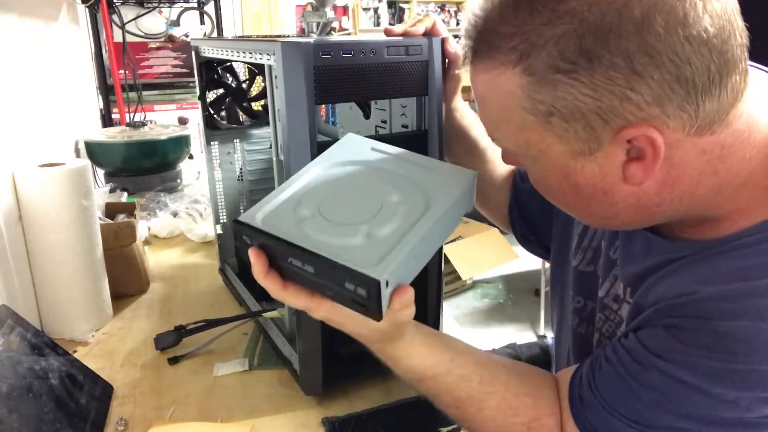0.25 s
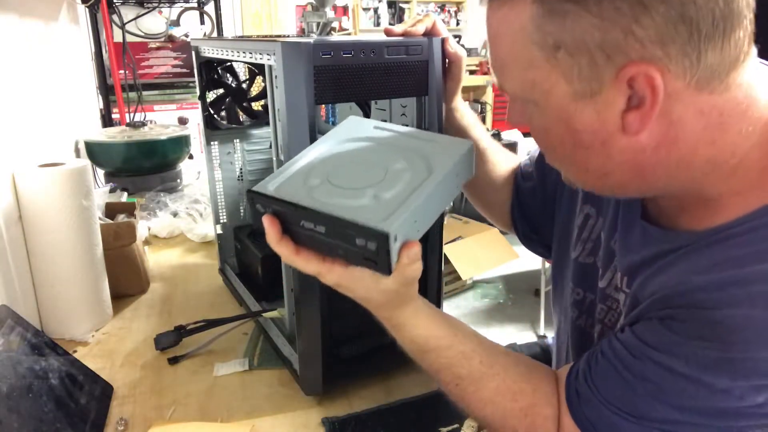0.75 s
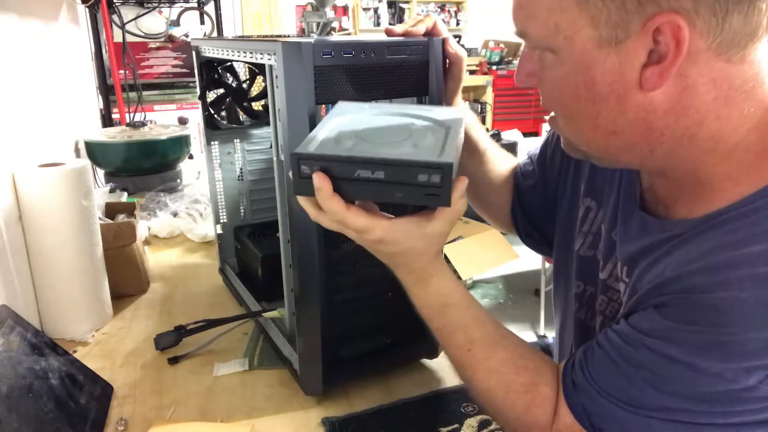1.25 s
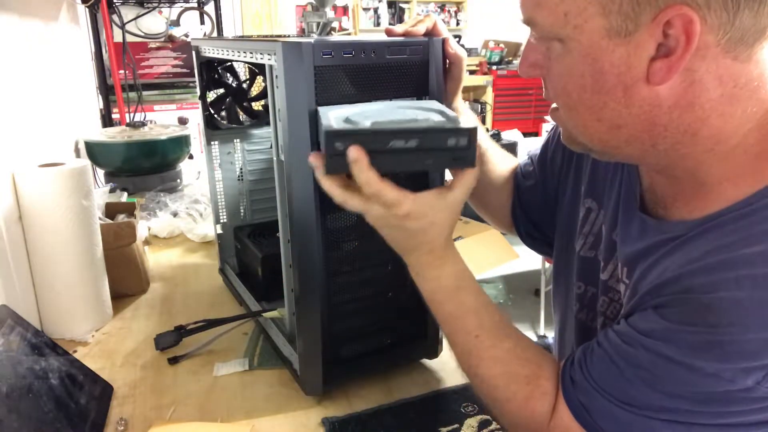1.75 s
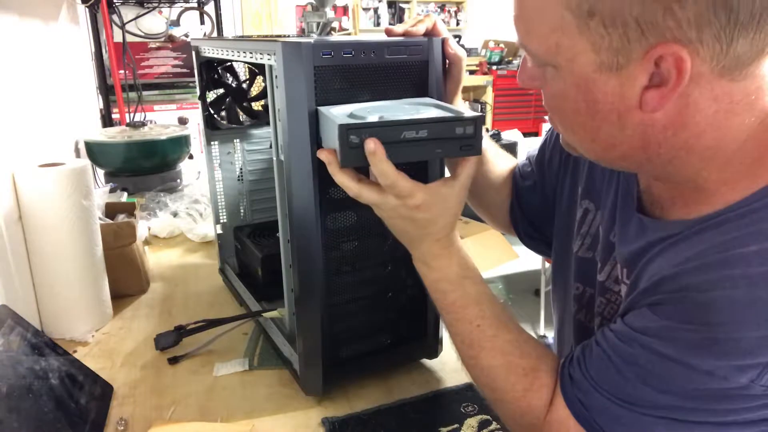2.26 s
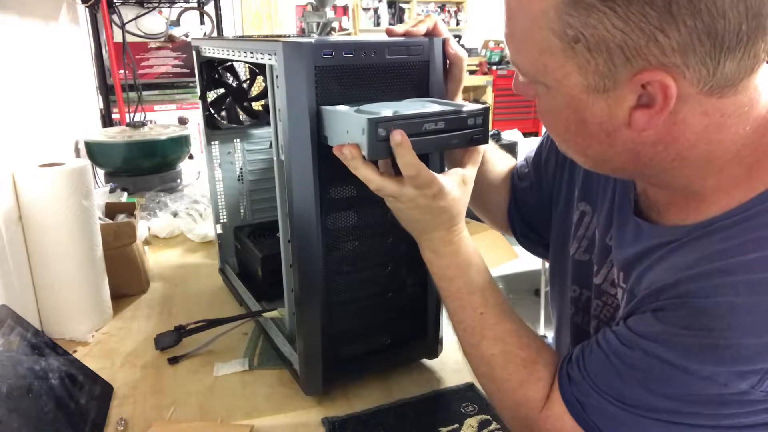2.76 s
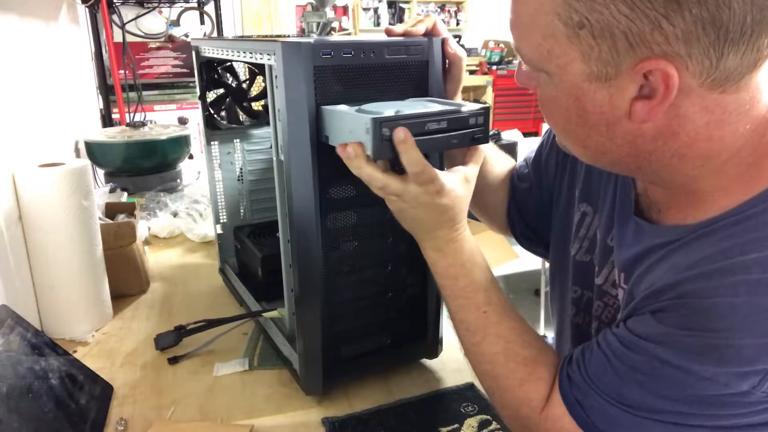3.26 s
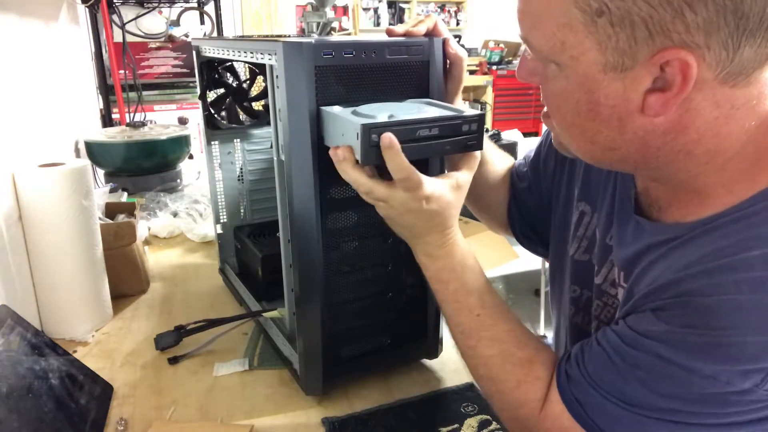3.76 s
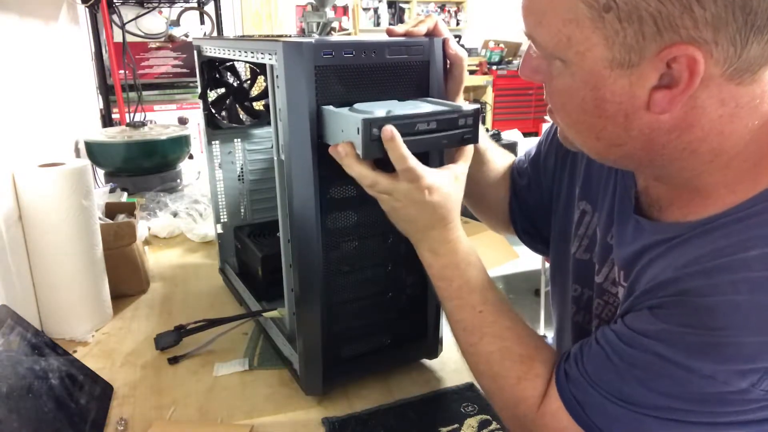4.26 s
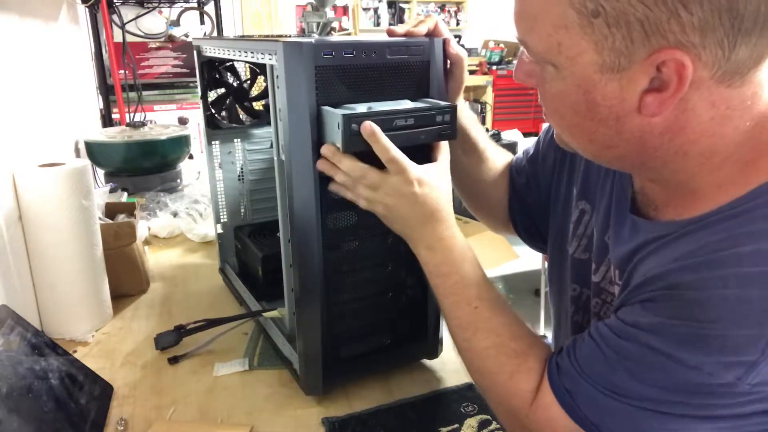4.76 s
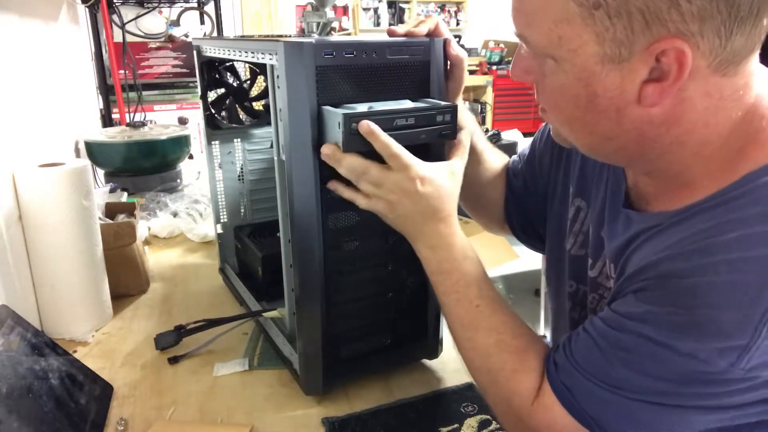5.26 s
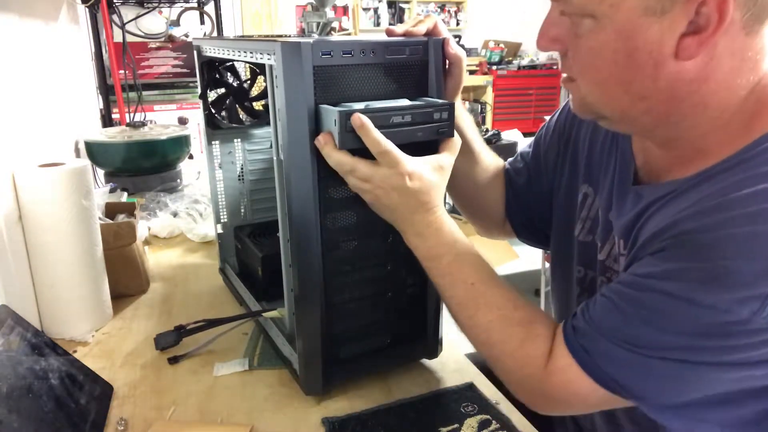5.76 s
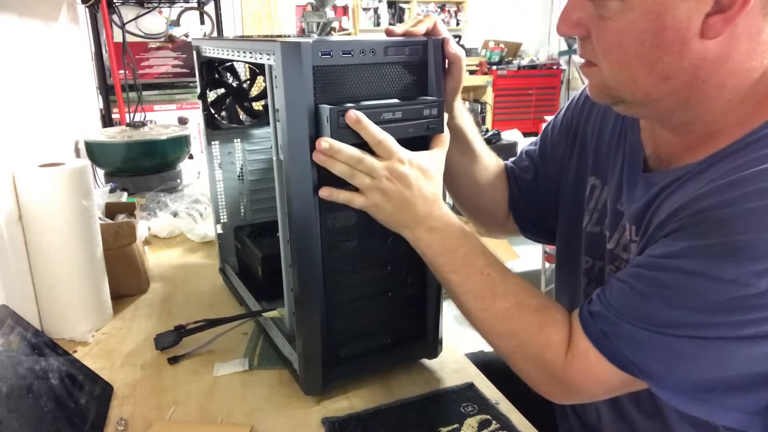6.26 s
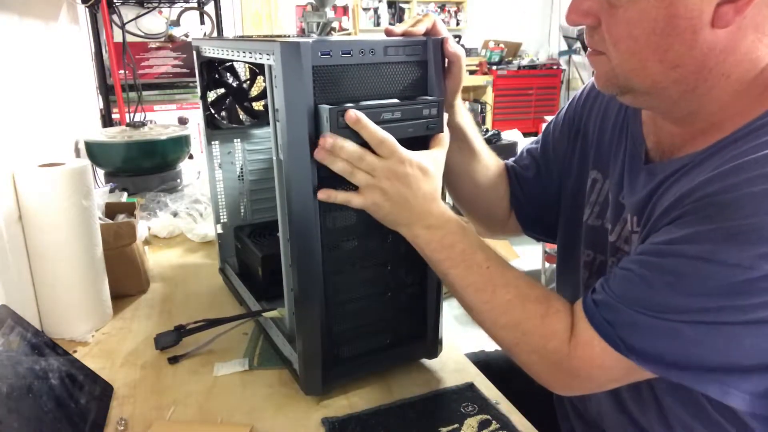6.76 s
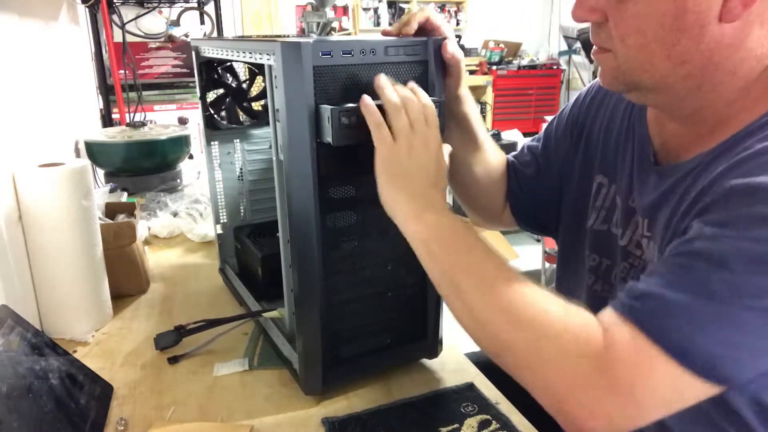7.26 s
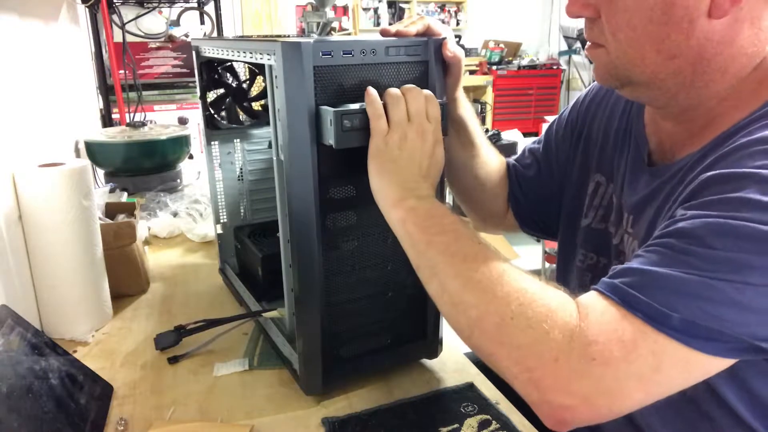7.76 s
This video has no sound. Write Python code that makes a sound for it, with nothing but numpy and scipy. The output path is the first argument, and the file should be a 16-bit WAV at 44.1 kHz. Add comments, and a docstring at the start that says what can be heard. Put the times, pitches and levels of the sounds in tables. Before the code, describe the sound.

In a small workshop, soft fan rush and low hum run throughout while a cricket chirps faintly and a dull bump hits the bench. A metal drive then slides into a steel case in short gritty scrapes with sharp ticks and brief squeals, loudest past the middle. Dull bumps gather near the end. Close microphone, slight room ring.

```python
"""A metal drive is pushed by hand into a steel computer case in a workshop, over 8 s of fan rush and hum.
First a cricket chirps outside (sine strokes in pairs) and a bump comes through the bench (low swings).
From 1.2 s the drive slips in short scrapes (grit noise through sheet-metal modes), with hard ticks (noise
cracks) and squeals and pings (single modes); a low drone swells until about 3.7 s. The scrapes are loudest
near 4.3 and 4.7 s and cluster again near 6 s; dull bumps crowd 6.9 to 7.9 s, and faint high pings end it."""
import sys
import numpy as np
from scipy import signal
from scipy.fft import rfft, irfft, next_fast_len
from scipy.io import wavfile
from scipy.ndimage import uniform_filter1d, map_coordinates

SR = 44100
rng = np.random.default_rng(int(sys.argv[2]) if len(sys.argv) > 2 else 0)


def transcribe(u):
    """Save the signal u as a 16-bit wav file named by the first command-line argument.

    u: samples, shape (n,) or (channels, n), limited to [-1, 1]; the rate is SR.
    q: integer samples, one column per channel.
    """
    v = np.clip(np.atleast_2d(u).T, -1, 1)
    q = np.round(v * 32767).astype(np.int16)
    wavfile.write(sys.argv[1], SR, q)


N = 352800

# slips of the drive on the rails: (time [s], scrape level [dB rms], rise [ms], fall before FALL_SCALES [ms],
# weight of the contact [dB], hiss against the scrape [dB])
SLIPS = [(1.169, -40.5, 11.8, 26.5, -5, -15), (1.2, -45.5, 12, 11, 0, -7.5),
         (1.314, -57.5, 13, 50, -3, -15), (1.731, -60, 59, 77, 2.5, -13), (1.798, -50.5, 30, 46, 1, -19),
         (1.845, -49.5, 5, 32, -11, -15), (2.049, -28.5, 10.3, 17.3, -6.5, -13),
         (2.082, -36, 14, 16, -13, -10), (2.174, -40.5, 2.4, 14, -4.5, -15), (2.326, -30, 11, 5.4, 1.5, -8),
         (2.359, -33.5, 28, 15, -20, -9), (2.3815, -32, 1.5, 8, -14, -15), (2.398, -37.5, 8, 12, -10, -17),
         (2.435, -48, 71, 18, 1.5, -20), (2.469, -51, 23, 21, -25, -8), (2.51, -52.5, 35, 14, 9, -4.5),
         (2.537, -39, 19, 43, -36, -11.5), (2.568, -29, 13, 12, 2, -13), (2.599, -42.5, 23, 17, 11, -6),
         (2.864, -40.5, 9.7, 19.7, 8.5, -13), (3.195, -63, 23, 20, -13, -12.5),
         (3.361, -36, 11.2, 17.7, -2, -10.5), (3.785, -41, 3.1, 16, -32, -4),
         (3.795, -42.5, 16, 4.7, -3.5, -5), (3.878, -52.5, 3, 10, -3, 3), (3.89, -46, 8, 8.4, -1, -8.5),
         (3.965, -59, 26, 42, 2, -25), (4.254, -39, 4.1, 4.9, -33, -6), (4.265, -38, 8, 10, -20, -10.5),
         (4.275, -29.5, 5, 21, -9, -10), (4.301, -19.5, 5.3, 12.2, -5.5, -13.5),
         (4.371, -39, 15, 14, -8.5, -14.5), (4.551, -40, 15.3, 20, -5.5, -9),
         (4.674, -35.5, 2.9, 95, -28.5, -10), (4.701, -26.5, 4.4, 30, 1, -9.5),
         (4.72, -24, 25, 33, -9.5, -6.5), (4.749, -15.5, 10.3, 9.4, -3.5, -12),
         (4.815, -48.5, 22, 14, 11, -12), (5.11, -72, 14.4, 29.5, 14, -1),
         (5.805, -39, 7.5, 15.5, 0.5, -21), (5.904, -35, 8.4, 34, -16, -13),
         (5.952, -39.5, 40, 20, -7, -10), (6.005, -34, 16.4, 38, -12, -16), (6.023, -27, 15, 20, -18, -12),
         (6.047, -20, 4.3, 3.7, -16.5, -8), (6.061, -28.5, 20, 13.3, -10, -9),
         (6.1, -41.5, 18, 28, -21.5, -8.5), (6.826, -50, 6.4, 4.3, -8, -21),
         (7.525, -63.5, 30, 67, 3, -6.5), (7.722, -44, 6.3, 14.5, -42, -20.5),
         (7.805, -58.5, 22, 29, -0.5, -15)]
# bands of scrape, boom, knock, hiss: (low edge [Hz], high edge [Hz])
PART_BANDS = [(2200, 7000), (200, 600), (600, 2200), (7000, 17000)]
# length of the fall of scrape, boom, knock, hiss against the slip's: [ratio]
FALL_SCALES = [0.9, 1.43, 1.25, 0.81]
# modes of the sheet metal: (frequency [Hz], width [Hz], level [dB])
SHEET_MODES = [(351.2, 25, 1.5), (580, 13, -26.5), (1064, 60, 3), (1294, 93, 8.5), (1602, 50, 0),
               (1991, 15, 6.5), (2140, 25, -33.5), (2450, 23, 8), (2705, 41, 2), (2990, 43, 10.5),
               (3290, 37, 6.5), (3706, 110, 7.5), (4010, 120, -2), (4355, 120, 8), (4410, 46, -3.5),
               (5200, 143, 5.5), (5580, 53, 5), (5830, 110, 3.5), (7020, 210, -5.5), (6700, 80, -1.5),
               (7550, 24, -11.5), (7620, 120, -3), (9200, 89, -12.5), (10700, 500, -17.5),
               (11600, 140, -27.5), (13600, 180, -10)]
# direct rasp of the contact: (frequency [Hz], level [dB])
DIRECT_RASP = [(200, -10.5), (300, -19), (1000, -0.5), (3000, 0), (6000, -2.5), (9000, -13), (12000, -16.5),
               (16000, -27)]
# hard ticks, edge against edge: (time [s], strength before TICK_DB and the sheet [dB])
TICKS = [(1.843, -49), (2.044, -27.5), (2.0804, -20), (2.172, -27.5), (2.3158, -16), (2.381, -23.5),
         (2.5626, -15.5), (2.86, -30), (3.355, -34), (3.782, -37), (3.8766, -23), (4.2522, -23),
         (4.271, -17.5), (4.2903, -4.5), (4.301, -13), (4.368, -31), (4.5292, -25.5), (4.671, -22),
         (4.681, -30), (4.7018, -8.5), (4.719, -3.5), (4.736, -2.5), (4.7443, -8), (5.7933, -32),
         (5.8026, -31.5), (5.892, -22.5), (5.952, -26.5), (6.0427, -16.5), (7.723, -27.5)]
# squeals and pings, one mode of the metal each: (time [s], level [dB], pitch [Hz], t60 [s])
PINGS = [(1.163, -38, 2990, 0.15), (1.17, -39, 1062, .1), (1.199, -45, 3060, .15), (1.79, -48, 3360, 0.17),
         (1.843, -39, 6100, 0.056), (1.895, -46, 3700, .07), (2.044, -30, 3040, 0.2),
         (2.173, -27.5, 3070, 0.069), (2.172, -45.5, 5840, 0.18), (2.38, -29, 1480, 0.13),
         (2.416, -47, 5880, .4), (2.461, -36, 3970, 0.14), (2.512, -39, 2960, 0.22), (2.535, -37, 5400, .1),
         (2.57, -41, 351, .19), (2.571, -26, 1044, 0.11), (2.869, -33, 338, 0.097),
         (3.352, -35, 4240, 0.13), (3.356, -39, 3030, 0.12), (3.357, -26.5, 348, 0.1),
         (3.777, -40, 3070, 0.15), (3.79, -42, 5720, 0.11), (3.781, -35, 4890, 0.1),
         (3.882, -46, 5900, 0.1), (3.887, -38.5, 4360, 0.078), (3.886, -36.5, 2680, 0.094),
         (4.252, -36, 5000, .07), (4.251, -32, 4390, 0.068), (4.271, -26.5, 2740, .1),
         (4.303, -24.5, 362.3, 0.18), (4.541, -46, 2796, 0.23), (4.675, -31.5, 1900, 0.078),
         (4.731, -27.5, 1143, 0.17), (5.799, -28.5, 1134, .17), (5.889, -41, 5400, .07),
         (5.905, -37.5, 1150, 0.4), (5.948, -22.5, 1246, 0.065), (5.99, -38.5, 1154, 0.33),
         (6.007, -23.5, 3550, 0.073), (6.197, -49.5, 9800, 0.037), (7.936, -58, 11600, .06),
         (7.94, -67, 14100, .25), (7.945, -65.5, 9590, .08)]
# jolts through the bench: (time [s], swing level [dB], pitch at mid-jolt [Hz])
BUMPS = [(0.8604, -14.5, 495), (0.8644, -11, 292), (0.873, -23, 154), (0.898, -35, 154), (0.916, -33, 184),
         (0.928, -38, 142), (0.942, -32, 171), (1.225, -25.5, 202), (1.312, -39, 132), (1.343, -31, 248),
         (1.74, -36.5, 178), (1.796, -31, 122), (2.247, -34.5, 144), (2.28, -33, 135), (4.998, -42, 130),
         (5.016, -41.5, 197), (5.124, -37, 130), (5.136, -36, 130), (5.155, -41, 202), (5.188, -40, 140),
         (5.251, -25, 327), (5.312, -43, 140), (5.338, -42, 300), (5.505, -41, 120), (5.551, -23, 330),
         (6.178, -29.5, 130), (6.854, -26.5, 133), (6.893, -28.5, 244), (6.942, -12.5, 296),
         (6.951, -25.5, 352), (6.962, -20.5, 200), (7.001, -23, 255), (7.018, -34, 237), (7.253, -27, 128),
         (7.263, -27, 131), (7.292, -27, 148), (7.365, -38, 169), (7.397, -37, 102), (7.415, -46, 110),
         (7.441, -17, 196), (7.484, -33, 201), (7.522, -37, 127), (7.54, -39, 153), (7.588, -40, 191),
         (7.628, -36, 126), (7.636, -26, 333), (7.643, -12, 229), (7.649, -26.5, 476), (7.651, -22, 112),
         (7.675, -44, 100), (7.715, -37, 247), (7.724, -36, 150), (7.737, -32.5, 150), (7.768, -34, 155),
         (7.829, -43, 130), (7.857, -28, 310), (7.862, -30.5, 121)]
# rocking of the case on the bench: (time [s], level before the soft onset [dB])
THUDS = [(4.31, -54), (4.709, -32), (4.75, -20.5), (4.802, -34)]
# cricket stroke pairs: (time [s], level of the first stroke [dB], gap [ms])
CHIRPS = [(0.213, -58.5, 47), (0.4833, -65, 44), (0.7495, -58, 43), (1.0331, -65, 43), (1.31, -55.5, 45),
          (1.6578, -55, 42)]
# decay of the workshop: (frequency [Hz], t60 [s])
ROOM_DECAY = [(200, 0.068), (2000, 0.42), (12000, 0.41)]
# fan rush, level over time: (time [s], level [dB rms])
RUSH_LEVEL = [(0, -55.5), (.86, -54.5), (.875, -61), (1.05, -60.5), (1.2, -54.5), (1.4, -51.5), (1.7, -52),
              (1.95, -47.5), (3, -50), (3.5, -50.5), (4, -50.5), (4.65, -53), (4.88, -58.5), (5.1, -51),
              (5.65, -54.5), (6.2, -50), (6.9, -53.5), (8, -50.5)]
# fan rush, spectrum: (frequency [Hz], relative density [dB per Hz])
RUSH_SPECTRUM = [(25, -19.5), (60, -9.5), (100, -0.5), (160, 0), (230, -11), (280, -16.5), (500, -14.5),
                 (800, -14.5), (1250, -12.5), (2200, -19.5), (4000, -26), (6500, -35.5), (8500, -44),
                 (11000, -54), (16000, -56.5)]
# narrow band in the rush: (frequency [Hz], width of the mode, applied twice [Hz], level against the rush [dB rms])
RUSH_BANDS = [(351.6, 66, -7)]
# motor tones: (mean frequency [Hz], level against the rush [dB rms])
MOTOR_TONES = [(312, -23), (661, -14.5)]
# low drone that swells and fades: (time [s], level [dB rms])
DRONE_LEVEL = [(0, -56.5), (.42, -48.5), (.65, -54.5), (.85, -51.5), (.95, -68), (1.2, -44.5), (1.5, -57.5),
               (1.9, -51.5), (2.3, -51.5), (2.6, -49), (2.85, -53.5), (3.1, -48), (3.7, -67.5), (8, -65)]

# boom and knock against the scrape: level at weight 0, then growth per dB of weight
BOOM_DB, BOOM_DB_PER_DB = 0.17, 0.87
KNOCK_DB, KNOCK_DB_PER_DB = 1.5, 0.52
TICK_DB, TICK_T60_S, TICK_LOW_CUT_HZ = -5.0, 0.0038, 700
# spread of a ping's pitch: the smaller of a fixed value and a share of the pitch
FLUTTER_MAX_HZ, FLUTTER_SHARE = 150, 0.11
BUMP_LENGTH_CYCLES = 1.18
# click in a jolt: level for a 0 dB jolt, growth per dB of jolt, half-width at 1/e
SNAP_DB, SNAP_DB_PER_DB, SNAP_S = -4.5, 2.64, 0.00017
HEAVE_HZ, HEAVE_DB = 70, -18.5
SHUDDER_DB, SHUDDER_T60_S = 18, 0.11
THUD_HZ, THUD_T60_S, THUD_ONSET_S = 145, 0.079, 0.0036
CHIRP_HZ, SECOND_STROKE_DB = 7010, -0.5
METAL_ROOM_DB, CRICKET_ROOM_DB = -24.5, -13
DRONE_HZ = 89
MIC_LOW_CUT_HZ, TOP_HZ = 45, 15950


def amp(db):
    """dB to gain."""
    return 10 ** (np.asarray(db) / 20)


def unit(x):
    """Scaled to rms 1."""
    return x / np.sqrt(np.mean(x ** 2) + 1e-20)


def along(points, hz):
    """Value at hz from (Hz, value) points on a log axis."""
    f, v = np.transpose(points)
    return np.interp(np.log(hz + 1), np.log(f + 1), v)


def curve(rows):
    """One value per sample from (s, value) rows."""
    return np.interp(np.arange(N) / SR, *np.transpose(rows))


def wobble(knots_per_s):
    """A smooth random curve through Gaussian knots."""
    knots = rng.standard_normal(int(N * knots_per_s / SR) + 4)
    return map_coordinates(knots, [np.arange(N) * knots_per_s / SR])


def filtered(x, response):
    """x times a complex response of frequency."""
    m = next_fast_len(N + SR // 2)
    return irfft(rfft(x, m) * response(np.fft.rfftfreq(m, 1 / SR)), m)[..., :N]


def mode(f, hz, width_hz):
    """Response of one causal resonance, 1 at its peak."""
    return 1j * f * width_hz / (hz * hz - f * f + 1j * f * width_hz)


def patchy(x, patchy_db, size):
    """x at rms 1 with time-frequency patches of random gain, size = (bands, frames)."""
    z = signal.stft(x, nperseg=256)[2]
    field = uniform_filter1d(rng.standard_normal(z.shape), size[0], 0)
    field = uniform_filter1d(field, size[1], 1)
    return unit(signal.istft(z * amp(patchy_db * unit(field)), nperseg=256)[1][:N])


def add(track, s, sound):
    """Mixes a short sound in at s seconds."""
    part = track[max(round(s * SR), 0):][:len(sound)]
    part += sound[:len(part)]


def sheet(f):
    """The case rings in its modes over the direct rasp."""
    response = amp(along(DIRECT_RASP, f))
    for k, (hz, width_hz, db) in enumerate(SHEET_MODES):
        response = response + (-1) ** k * amp(db) * mode(f, hz, width_hz)
    return response


def drive():
    """Each slip drags grit over the rails; the grit shakes the sheet, the firmer the contact the deeper."""
    power = np.zeros((len(PART_BANDS), N + SR))
    t = np.arange(-SR // 10, SR // 5) / SR
    t_ms = 1000 * t
    for s, db, rise_ms, fall_ms, weight_db, hiss_db in SLIPS:
        boom_db = BOOM_DB + BOOM_DB_PER_DB * weight_db
        knock_db = KNOCK_DB + KNOCK_DB_PER_DB * weight_db
        for row, part_db, scale in zip(power, [0, boom_db, knock_db, hiss_db], FALL_SCALES):
            # the slip starts from rest, so its foot is steep; it dies away evenly
            rise = (t_ms / max(rise_ms, 1)) ** 2
            fall = t_ms / max(scale * fall_ms, 1)
            add(row, s + t[0], amp(db + part_db - 8 * np.where(t < 0, rise, fall)) ** 2)
    # dense grains of very uneven size
    grain_db = 3.1 * np.minimum(rng.exponential(size=N), 4.5) + 1.4 * wobble(300)
    grit = rng.standard_normal(N) * amp(grain_db)
    # the spot that rubs changes, and the colour with it
    grit = patchy(grit, patchy_db=2.5, size=(3, 6))
    out = np.zeros(N)
    for row, band_hz in zip(power, PART_BANDS):
        band = signal.butter(3, band_hz, "band", fs=SR, output="sos")
        steady = filtered(signal.sosfilt(band, grit), sheet)
        slips = filtered(signal.sosfilt(band, np.sqrt(row[:N]) * grit), sheet)
        out += slips / np.std(steady)
    return out


def ticks():
    """A tick is a noise crack of a millisecond or two that sets the sheet ringing."""
    blows, t = np.zeros(N), np.arange(SR // 100) / SR
    for s, db in TICKS:
        crack = rng.standard_normal(len(t))
        add(blows, s, amp(db + TICK_DB - 60 * t / TICK_T60_S) * crack)
    return filtered(blows, lambda f: sheet(f) * 1j * f / (TICK_LOW_CUT_HZ + 1j * f))


def pings():
    """One mode rings and dies; the rubbing contact makes its pitch and strength flutter."""
    out, t = np.zeros(N), np.arange(SR // 4) / SR
    flutter = np.cumsum(wobble(700)) / SR
    sway_db = 2.8 * wobble(200)
    onset = 1 - np.exp(-t / 0.002)
    for s, db, hz, t60_s in PINGS:
        here = round(s * SR) + np.arange(len(t))
        spread_hz = min(FLUTTER_MAX_HZ, FLUTTER_SHARE * hz)
        phase = 2 * np.pi * (hz * t + spread_hz * flutter.take(here, mode="clip"))
        level_db = db - 60 * t / t60_s + sway_db.take(here, mode="clip")
        add(out, s, amp(level_db) * onset * np.sin(phase))
    return out


def bumps():
    """A jolt is one or two low swings that drop in pitch, over a slower heave of the bench."""
    out, t = np.zeros(N), np.arange(-SR // 40, SR // 20) / SR
    heave_db = HEAVE_DB - 4.8 * ((t - 0.004) / 0.013) ** 2
    heave = amp(heave_db) * np.sin(2 * np.pi * HEAVE_HZ * t)
    for s, db, hz in BUMPS:
        u = 2 * t * hz / BUMP_LENGTH_CYCLES  # time in half-lengths
        swell = amp(-6 * np.where(u < 0, 1.3, 0.8) * u ** 2)
        phase = 2 * np.pi * hz * t * np.exp(-0.2 * np.tanh(u)) + rng.uniform(-1.8, 0.63)
        swing = np.cos(phase) + amp(-25.0) * np.cos(2 * phase)  # the stand meets its stop harder one way
        snap = amp(SNAP_DB + SNAP_DB_PER_DB * db) * np.exp(-(t / SNAP_S) ** 2)
        add(out, s + t[0], amp(db) * (swell * swing + heave) + snap)
    return -out


def shudder(jolts):
    """After a jolt the bench keeps rattling faintly: noise under a decaying envelope, low and dull."""
    t = np.arange(SR // 5) / SR
    decay = amp(-60 * t / SHUDDER_T60_S) / (0.018 * SR)
    envelope = np.abs(signal.fftconvolve(np.abs(jolts), decay)[:N])
    rattle = envelope * unit(rng.standard_normal(N) * amp(6.7 * wobble(60)))

    def wood(f):
        """Two bench modes, dulled above 900 Hz."""
        return (mode(f, 65, 83) + amp(-28) * mode(f, 500, 360)) / (1 + 1j * f / 900) ** 4

    return amp(SHUDDER_DB) * filtered(rattle, wood)


def thuds():
    """The case rocks on the bench: a low tone that starts softly and dies fast."""
    out, t = np.zeros(N), np.arange(SR // 5) / SR
    tone = (1 - np.exp(-t / THUD_ONSET_S)) * np.sin(2 * np.pi * THUD_HZ * t)
    for s, db in THUDS:
        add(out, s, amp(db - 60 * t / THUD_T60_S) * tone)
    return out


def cricket():
    """Pairs of short wing strokes on one pitch."""
    out, t = np.zeros(N), np.arange(SR // 20) / SR
    stroke = amp(-2.8 * ((t - 0.012) / 0.0056) ** 2) * np.sin(2 * np.pi * CHIRP_HZ * t)
    for s, db, gap_ms in CHIRPS:
        add(out, s, amp(db) * stroke)
        add(out, s + gap_ms / 1000, amp(db + SECOND_STROKE_DB) * stroke)
    return out


def room(x):
    """The workshop answers with a noise tail; each frequency dies at its own speed."""
    hz, t, z = signal.stft(rng.standard_normal(SR // 2), SR, nperseg=256)
    decay_db = -60 * t / along(ROOM_DECAY, hz)[:, None]
    tail = signal.istft(z * amp(decay_db), SR, nperseg=256)[1]
    delayed = np.pad(x, (200, 0))  # samples
    return signal.fftconvolve(delayed, tail / np.linalg.norm(tail))[:N]


def background():
    """Fan rush (shaped noise) with a narrow band and motor tones, and the drone, a tone that wavers."""
    rush = patchy(rng.standard_normal(N), patchy_db=1.18, size=(5, 20))
    rush = unit(filtered(rush, lambda f: amp(along(RUSH_SPECTRUM, f))))
    for hz, width_hz, db in RUSH_BANDS:
        band = filtered(rng.standard_normal(N), lambda f: mode(f, hz, width_hz) ** 2)
        rush += amp(db) * unit(band)
    for hz, db in MOTOR_TONES:
        tone = np.sin(2 * np.pi * np.cumsum(hz + 1.4 * wobble(7.2)) / SR)
        rush += amp(db + 0.6 * wobble(5.5)) * unit(tone)
    drone = np.sin(2 * np.pi * np.cumsum(DRONE_HZ + 0.33 * wobble(3.4)) / SR)
    drone = unit(amp(0.51 * wobble(8)) * drone)
    return amp(curve(RUSH_LEVEL) + 0.63 * wobble(3.3)) * rush + amp(curve(DRONE_LEVEL)) * drone


def scene():
    """Metal and cricket ring in the room; the bumps come through the bench."""
    metal = drive() + ticks() + pings()
    jolts = bumps()
    bench = jolts + shudder(jolts) + thuds()
    insect = cricket()
    echo = room(amp(METAL_ROOM_DB) * metal + amp(CRICKET_ROOM_DB) * insect)
    return (metal + insect + echo + bench + background())[None]


def record(dry):
    """The microphone drops the deep bass; nothing passes above the band limit."""
    def response(f):
        """Two first-order low cuts under a sharp top edge."""
        return (f < TOP_HZ) * (1j * f / (MIC_LOW_CUT_HZ + 1j * f)) ** 2

    return filtered(dry, response)


dry = scene()
out = record(dry)
transcribe(out)
```